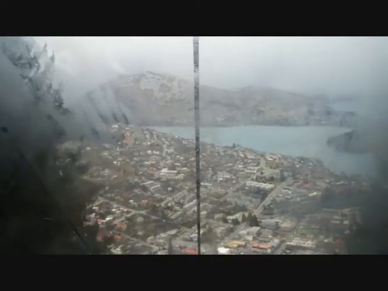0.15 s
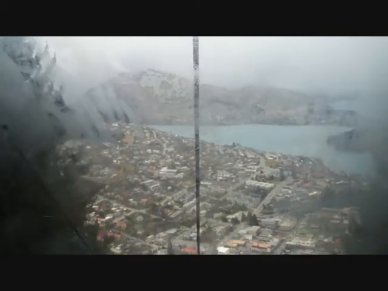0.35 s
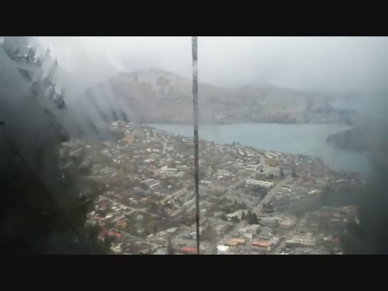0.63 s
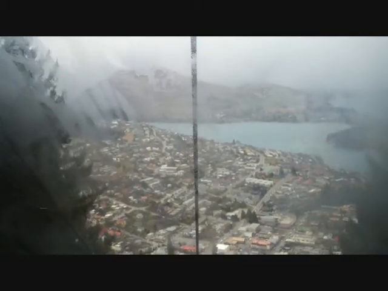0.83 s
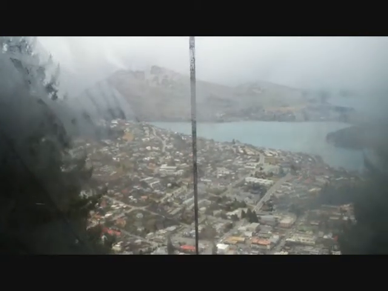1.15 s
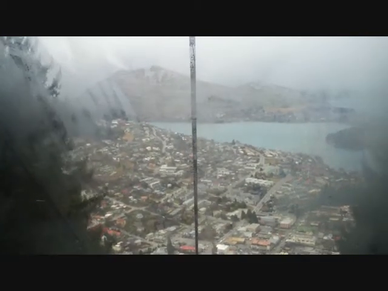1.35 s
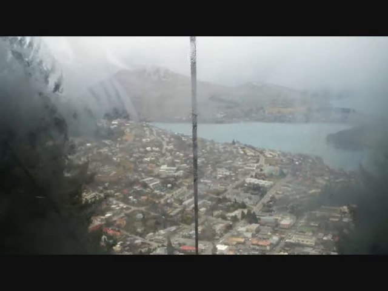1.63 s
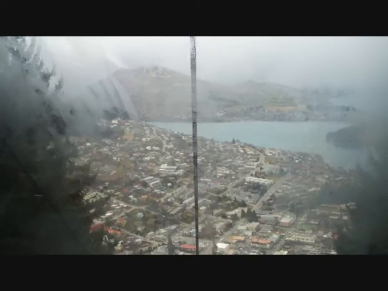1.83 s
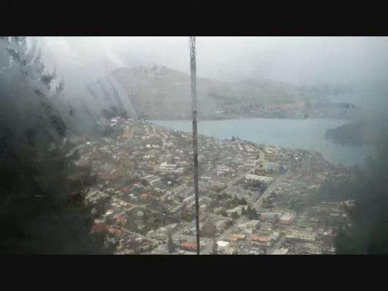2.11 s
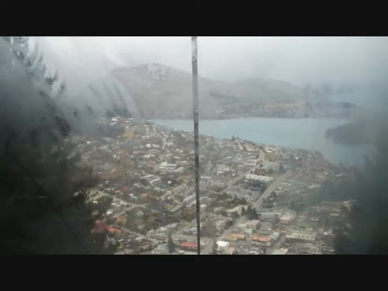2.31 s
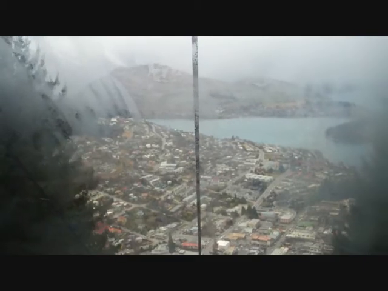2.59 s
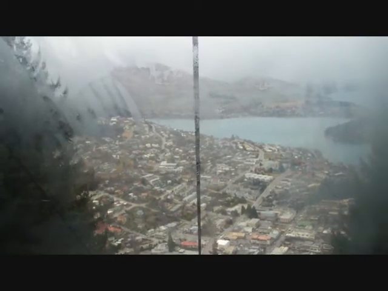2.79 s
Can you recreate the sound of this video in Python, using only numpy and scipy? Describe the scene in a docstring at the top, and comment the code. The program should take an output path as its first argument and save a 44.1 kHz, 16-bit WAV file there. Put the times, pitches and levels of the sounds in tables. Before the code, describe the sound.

Uneven cabin knocks and dull panel rattles begin in a dense cluster, thin to a short lull, then resume irregularly over deep wavering hum and rumble; enclosed, close stereo camera sound with soft hiss and thin whine.

```python
"""Inside a cable gondola cabin climbing uphill, for about three seconds, over steady hiss and a thin whine.
Jolts from the cable crowd the first half second, the hardest near 0.34 s, and thin out to a lull near 0.8 s.
They return unevenly to the end; the hull hum near 50 Hz sinks to about 43 Hz at 1.95 s, then jumps to 54 Hz.
Hum is a wandering tone and boom is noise in low resonances; each jolt excites loose panels with a decaying
chatter of impacts, filtered by the cabin's resonances. Hiss and whine come from the camera."""
import sys
import numpy as np
from scipy import signal
from scipy.fft import rfft, irfft
from scipy.io import wavfile
from scipy.ndimage import uniform_filter1d

SR = 44100
rng = np.random.default_rng(int(sys.argv[2]) if len(sys.argv) > 2 else 0)


def master_out(mix):
    """Clip the mix to full scale and print it as 16-bit PCM to the path in sys.argv[1]."""
    frames = np.transpose(np.atleast_2d(mix))
    ceiling = np.clip(frames, -1, 1)
    pcm = np.round(ceiling * 32767).astype(np.int16)
    wavfile.write(sys.argv[1], SR, pcm)


N = 130095  # samples
TIME = np.arange(N) / SR  # s


def amp(db):
    """Decibel law: amplitude grows tenfold per 20 dB."""
    return 10 ** (np.asarray(db) / 20)


def evened(x):
    """Normalization: scales a signal to unit RMS."""
    return x / np.sqrt(np.mean(x ** 2) + 1e-20)


def read(points, hz):
    """Logarithmic frequency scale: interpolates a (Hz, value) curve along log frequency."""
    point_hz, value = np.transpose(points)
    return np.interp(np.log(hz + 1), np.log(point_hz + 1), value)


def filtered(x, gain):
    """Linear filtering: multiplies the spectrum by gain(hz)."""
    return irfft(rfft(x) * gain(np.fft.rfftfreq(N, 1 / SR)), N)


def convolved(x, impulse_response):
    """Convolution: passes both channels through one impulse response of unit energy."""
    unit = impulse_response / np.linalg.norm(impulse_response)
    return signal.oaconvolve(x, unit[None], axes=1)[:, :N]


def ring(x, modes):
    """Modal superposition: sums damped sines that start from zero, with alternating signs."""
    t = np.arange(SR // 4) / SR
    response = np.zeros(len(t))
    for k, (hz, width_hz, db) in enumerate(modes):
        decay = np.exp(-np.pi * width_hz * t)
        strength = (-1) ** k * amp(db) * np.sqrt(width_hz)
        response += strength * decay * np.sin(2 * np.pi * hz * t)
    return convolved(x, response)


STEADIED = 0.33  # exponent on local power; 0.5 would level the swells fully


def steadied(x):
    """Level compression: evens out part of the chance swells of ringing noise."""
    local_power = uniform_filter1d(x[0] ** 2, size=2400)
    return evened(x / (local_power + 1e-9) ** STEADIED)


VALLEY_HZ = 98


def above_valley(x):
    """High-pass filtering: a steep slope keeps boom and rattle out of the hum's range."""
    return filtered(x, lambda f: f ** 6 / (f ** 6 + VALLEY_HZ ** 6))


def noise(shape, db):
    """Spectral shaping: colours white noise, steady and unrelated in two channels."""
    coloured = filtered(rng.standard_normal((2, N)), lambda f: amp(read(shape, f)))
    return amp(db) * evened(coloured)


# Spectrum of the camera hiss. Each row: frequency in Hz, relative density in dB per Hz.
HISS = [(200, 8), (2000, -2), (5000, -5.5), (8000, -10), (10000, -18.5), (11500, -32), (13000, -52)]
HISS_DB = -57


def hiss():
    """Stationary random noise: a falling spectrum, 1 dB louder on the right."""
    return noise(HISS, HISS_DB) * amp([[0], [1]])


# Level of the whine. Each row: level in dB, for the left channel, then the right.
WHINE_DB = [
    [-59],
    [-90],
]
WHINE_HZ, UPPER_TONE_DB = 7867.13, -38  # upper tone relative to the main one
FLIPS_PER_S, FIRST_FLIP_S, FLIP_S = 29.97, .0015, .0006  # FLIP_S: duration of one flip


def whine():
    """Phase reversal: the camera's electronics give a thin tone whose sign flips at a regular rate."""
    flip_count = np.floor((TIME - FIRST_FLIP_S) * FLIPS_PER_S)
    sign = uniform_filter1d((-1) ** flip_count, size=round(FLIP_S * SR))
    phase = 2 * np.pi * WHINE_HZ * TIME
    upper_tone = amp(UPPER_TONE_DB) * np.sin(phase * 3 / 2)
    return amp(WHINE_DB) * np.sqrt(2) * (sign * np.sin(phase) + upper_tone)


# Spectrum of the steady noise in the cabin. Each row: frequency in Hz, relative density in dB per Hz.
FLOOR = [(15, -3.5), (24, 4.5), (33, -7.5), (42, 5), (62, -1.5), (85, -4), (200, -28), (470, -20.5),
         (750, -23), (1500, -38), (3000, -42), (9000, -56)]
FLOOR_DB = -45


def cabin_floor():
    """Stationary random noise: a steady bed, strongest at low frequencies."""
    return noise(FLOOR, FLOOR_DB)


# Course of the hull hum. Each row: time in seconds, level in dB, pitch in Hz.
HUM = [(0.0, -39, 47.7), (0.06, -41, 48.8), (0.11, -36, 51), (0.252, -27, 50), (0.32, -42.5, 52.6),
       (0.43, -32, 50), (0.48, -47, 50.8), (0.61, -30.5, 50.7), (0.66, -53, 51.7), (0.711, -27, 50.6),
       (0.74, -38.5, 50.3), (0.79, -29, 47.64), (0.84, -35.5, 49.1), (0.87, -49, 49.8), (0.9, -33.5, 48.9),
       (1.09, -37.5, 48.2), (1.12, -42.5, 47.7), (1.4, -33, 49.25), (1.49, -40, 49.4), (1.55, -30.5, 48.5),
       (1.61, -43, 44.55), (1.64, -34.5, 44.8), (1.76, -33.5, 45.6), (1.78, -41, 45.04),
       (1.852, -27, 46.08), (1.95, -45, 42.86), (2.0, -34, 48), (2.031, -31.5, 50.1), (2.06, -49.5, 54.25),
       (2.091, -30, 53.4), (2.12, -47, 54.4), (2.16, -31.5, 52), (2.2, -38.5, 51), (2.26, -35.5, 50),
       (2.3, -40, 49.9), (2.46, -31, 50.03), (2.5, -39, 50.8), (2.54, -30.5, 50.5), (2.58, -29.5, 51.4),
       (2.62, -49, 51.4), (2.65, -35, 50.1), (2.75, -44, 48.74), (2.78, -39.5, 51.3), (2.95, -38.5, 52.4)]
HUM_WANDER_HZ, HUM_STEADY = 15.7, 0.79  # bandwidth of the wander; weight of the pure tone against it


def hull_hum():
    """Narrow-band modulation: slow complex noise makes a gliding tone waver in level and phase."""
    at, level_db, pitch_hz = np.transpose(HUM)
    in_phase, quadrature = (
        evened(filtered(rng.standard_normal(N), lambda f: 1 / (1 + (f / HUM_WANDER_HZ) ** 8)))
        for _ in range(2))
    wander = HUM_STEADY + (1 - HUM_STEADY) * (in_phase + 1j * quadrature)
    phase = 2 * np.pi * np.cumsum(np.interp(TIME, at, pitch_hz)) / SR
    tone = evened((wander * np.exp(1j * phase)).real)
    level = uniform_filter1d(amp(np.interp(TIME, at, level_db)), size=900)  # about 20 ms
    return level * tone


def boom(modes, at, level_db):
    """Resonant filtering: noise rings in low modes, again in one broad mode, and follows a level curve."""
    ringing = ring(rng.standard_normal((2, N)), modes)
    ringing = ring(ringing, [(modes[1][0], 60, 0)])  # centred on the second mode, 60 Hz wide
    return amp(np.interp(TIME, at, level_db)) * steadied(above_valley(ringing))


# Resonances of the lower and upper boom. Each row: frequency in Hz, width in Hz, relative strength in dB.
BOOM = [(110.5, 13.3, -3), (126.4, 35, 1), (138, 16, -3.5)]
UPPER_BOOM = [(162.6, 5.7, 4.5), (170, 79, -4.5)]
# Course of the boom. Each row: time in seconds, lower boom level in dB, upper boom level in dB.
BOOM_LEVEL = [(0.0, -47, -56), (0.05, -33.5, -49), (0.08, -49, -51.5), (0.24, -30, -32), (0.29, -35, -44),
              (0.41, -41, -39.5), (0.62, -39, -48.5), (0.71, -36.5, -43.5), (0.93, -50, -60),
              (0.97, -39.5, -41.5), (1.04, -35.5, -37.5), (1.08, -33.5, -39.5), (1.31, -53.5, -57.5),
              (1.37, -35.5, -43), (1.54, -32.5, -36), (1.57, -39.5, -36.5), (1.73, -34.5, -40.5),
              (1.81, -38.5, -53), (1.89, -36.5, -44), (2.12, -54, -61), (2.18, -53, -35.5),
              (2.25, -40.5, -51), (2.29, -34, -57), (2.36, -37.5, -57), (2.41, -38, -35.5),
              (2.62, -41.5, -40.5), (2.65, -36.5, -61), (2.78, -40.5, -42.5), (2.81, -47, -47.5),
              (2.95, -40, -46.5)]


def hull_boom():
    """Independent resonant bands: the hull's lower and upper boom swell separately."""
    at, lower_db, upper_db = np.transpose(BOOM_LEVEL)
    return boom(BOOM, at, lower_db) + boom(UPPER_BOOM, at, upper_db)


# Jolts from the cable. Each row: time in seconds, level in dB, bright rattle relative to the jolt in dB,
# thud relative to the jolt in dB, time of the main decay by 60 dB in seconds.
JOLTS = [(0.0, -33.5, -29, -2, 0.14), (0.079, -41, -20.5, -0.5, 1), (0.128, -31, -19.5, -3.5, 0.73),
         (0.163, -32.5, -18, -10, 0.39), (0.217, -28.5, -21, -2.5, 0.29), (0.259, -27.5, -20.5, 0.5, 0.29),
         (0.292, -31.5, -20, 3.5, 0.27), (0.322, -30.5, -14, -2, 0.22), (0.341, -23, -17.5, -5, 0.17),
         (0.368, -34, -17, 7.5, 0.3), (0.403, -27.5, -19.5, -6, 0.18), (0.426, -34, -29, 5, 0.077),
         (0.556, -47.5, -11, 5, 0.24), (0.581, -35, -23.5, -2.5, 0.48), (0.637, -35, -22, -2, 0.3),
         (0.658, -43, -12.5, 6.5, 0.36), (0.699, -51.5, -32, 1, 0.98), (0.799, -51, -35, -4, 0.25),
         (0.958, -30, -19, -1.5, 0.53), (1.013, -42, -7.5, 14, 0.34), (1.03, -45, -16, 5, 0.26),
         (1.06, -34, -24, -17, 0.31), (1.12, -37, -23, 3.5, 0.26), (1.17, -53, -34, 6, 1),
         (1.337, -34, -20, -3.5, 0.32), (1.367, -34, -23, -6, 0.28), (1.408, -32.5, -25, 2.5, 0.48),
         (1.427, -38.5, -20, -4, 0.56), (1.483, -32, -21, -21, 0.53), (1.516, -33.5, -16.5, 1.5, 0.14),
         (1.545, -34.5, -40, 1, 0.24), (1.59, -37, -23, -4, 0.36), (1.637, -34.5, -22, -2, 0.32),
         (1.684, -26.5, -24, -1, 0.16), (1.719, -43, -17, 6.5, 0.41), (1.757, -37, -23, 0, 0.49),
         (1.803, -38, -27, -21, 0.26), (1.823, -40.5, -23, 3, 0.62), (1.874, -43.5, -15, -8, 0.21),
         (1.903, -39.5, -25, -17, 0.36), (1.957, -41, -22, -7, 0.22), (2.082, -50, -27, -13, 0.77),
         (2.118, -44.5, -24, -16, 0.45), (2.152, -38.5, -16, -1, 0.33), (2.198, -50.5, -22, 3, 0.86),
         (2.258, -35, -16, 0, 0.27), (2.288, -35, -18, -17, 0.2), (2.325, -35, -17.5, -1, 0.87),
         (2.367, -33.5, -19, 0, 0.25), (2.386, -32, -27, -18, 0.26), (2.447, -30.5, -22.5, -6.5, 0.31),
         (2.539, -38.5, -15.5, -2.5, 0.48), (2.58, -33, -26, -2, 0.2), (2.621, -43, -24, 1, 0.27),
         (2.674, -35.5, -18, -3, 0.21), (2.744, -33, -26, -1, 0.23), (2.779, -44, -11, -13, 0.19),
         (2.846, -35, -28, -1.5, 0.18), (2.904, -44, -16, -10, 0.1), (2.926, -33, -19, -6, 0.45)]
# Start of the slow after-shake. Each row: relative level in dB, for the panels, the bright part, the thud.
LINGER_DB = [
    [-23],
    [-26.5],
    [-11],
]
LINGER_T60_S = 0.62
CRACK_DB, CRACK_T60_S = -9, 0.0072  # extra burst at the start of a jolt
RISE_S, LEAD_S = 0.0037, 0.0034  # linear rise; how far the rise begins before the listed time


def jolt_envelopes():
    """Exponential decay: jolts add in power, giving envelopes for panels, bright part and thud."""
    power = np.zeros((3, N))
    for s, db, bright_db, thud_db, t60 in JOLTS:
        first = round(max(s - LEAD_S, 0) * SR)
        t = np.arange(N - first) / SR
        main = amp(-60 * t / max(t60, .02))
        crack = amp(CRACK_DB - 60 * t / CRACK_T60_S)
        linger = amp(LINGER_DB - 60 * t / LINGER_T60_S)
        envelope = np.minimum(t / RISE_S, 1) * amp(db) * (main + crack + linger)
        power[:, first:] += (envelope * amp([[0], [bright_db], [thud_db]])) ** 2
    return np.sqrt(power)


CHATTER_PER_S, SPIKY_DB = 11000, 1.5  # mean rate of impacts; mean of their random boost before its cap


def chatter():
    """Random impulse train: dense impacts of random sign and strength, unrelated in two channels."""
    struck = rng.random((2, N)) < CHATTER_PER_S / SR
    boost = amp(SPIKY_DB * np.minimum(rng.exponential(1, (2, N)), 5))
    return evened(struck * boost * rng.standard_normal((2, N)))


# Broad spectrum of the rattle. Each row: frequency in Hz, relative density in dB per Hz.
CLATTER = [(150, 0.5), (250, 0), (700, -5), (1100, -8), (1900, -16.5), (2300, -29), (4500, -24),
           (8000, -48.5)]


def clatter(hits):
    """Minimum-phase filtering: gives impacts a broad colour without pre-echo."""
    grid = np.linspace(0, 1, 513)
    squared_gain = amp(2 * read(CLATTER, grid * SR / 2)) + 1e-9  # minimum_phase takes the root
    return convolved(hits, signal.minimum_phase(signal.firwin2(1023, grid, squared_gain)))


# Cabin resonances of thud, panels and bright part. Each row: frequency in Hz, width in Hz,
# relative strength in dB.
THUD = [(198.4, 22.3, 5.5), (258.2, 9.9, -3), (291, 27, -2), (320.7, 6.7, 0), (350.6, 24, -6),
        (381.4, 7, 0.5)]
PANELS = [(392, 18, 4.5), (463.3, 6.1, 10.5), (579, 20, 3), (626.7, 13.3, 4.5), (666.5, 14, 4),
          (727, 23.7, 5.5), (956.3, 9.5, -2), (982, 5.3, -6.5), (1044, 38, -5), (1222, 28, -38),
          (1401.5, 15, -5), (1720, 160, -46.5), (1766, 6, -16)]
BRIGHT = [(2556, 13, 0.5), (2973, 210, 11.6), (3283, 114, 5.3), (4060, 670, 10.5), (4760, 4500, 1.7)]
THUD_DB, PANELS_DB, BRIGHT_DB, CLATTER_DB = -7, -10.5, -2.5, -8  # mix gains


def rattle():
    """Source and resonator: each jolt's dying chatter excites the cabin's modes; its thud is ringing noise."""
    panel_env, bright_env, thud_env = jolt_envelopes()
    impacts = chatter()
    panel_hits = impacts * panel_env
    bright_hits = impacts * bright_env
    thud_env = uniform_filter1d(thud_env, size=600, origin=250)  # smoothed mostly over the past
    thud = steadied(ring(rng.standard_normal((2, N)), THUD)) * thud_env
    mix = amp(PANELS_DB) * ring(panel_hits, PANELS) + amp(BRIGHT_DB) * ring(bright_hits, BRIGHT)
    return mix + amp(THUD_DB) * thud + amp(CLATTER_DB) * clatter(panel_hits)


# Likeness of the two channels. Each row: frequency in Hz, correlation from 0 to 1.
SAME = [(60, .995), (130, .99), (270, .98), (590, .96), (1260, .78), (2690, .5), (5770, .3), (12300, .3)]
# Balance of the two channels. Each row: frequency in Hz, left gain minus right gain in dB.
PAN = [(60, -3.5), (130, -5), (270, -6), (590, -3.5), (1260, -5), (2690, -3), (5770, 6), (12300, 3)]


def likeness(hz):
    """Interchannel coherence: the share of the left signal found in the right."""
    return np.clip(read(SAME, hz), 0, 1)


def scene():
    """Partial coherence: two versions with a common hum and unrelated noise blend into close stereo."""
    first, second = cabin_floor() + hull_hum() + hull_boom() + above_valley(rattle())
    shared = filtered(first, likeness)
    own = filtered(second, lambda f: np.sqrt(1 - likeness(f) ** 2))
    left = filtered(first, lambda f: amp(read(PAN, f) / 2))
    right = filtered(shared + own, lambda f: amp(-read(PAN, f) / 2))
    return np.array([left, right])


EDGE_HZ = 12650


def record(dry):
    """Band limiting: adds the camera's hiss and whine, then a steep low-pass."""
    low_pass = signal.firwin(511, EDGE_HZ, window=("kaiser", 9), fs=SR)
    return signal.oaconvolve(dry + hiss() + whine(), low_pass[None], "same")


dry = scene()
out = record(dry)
master_out(out)
```